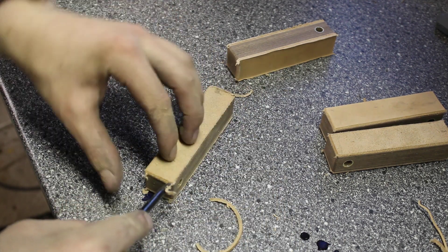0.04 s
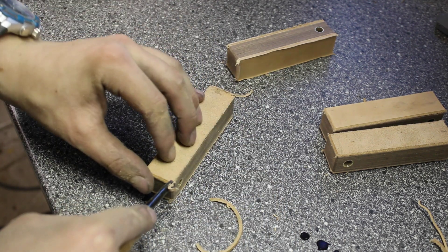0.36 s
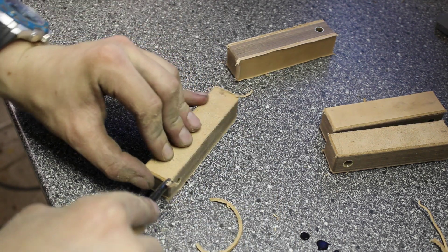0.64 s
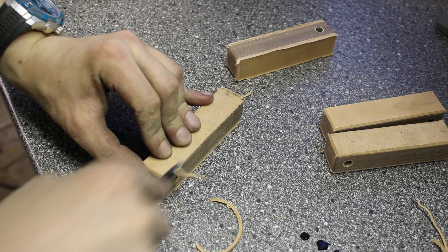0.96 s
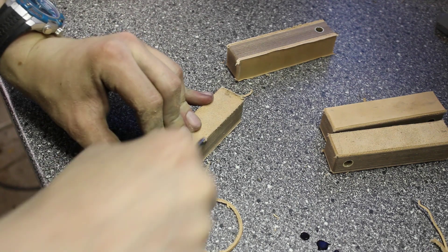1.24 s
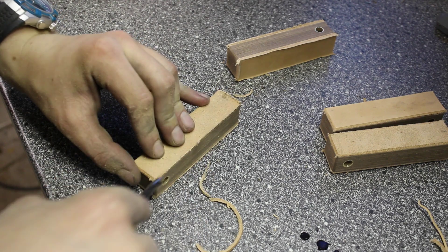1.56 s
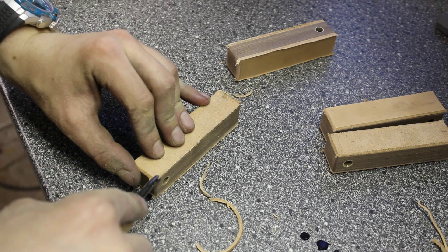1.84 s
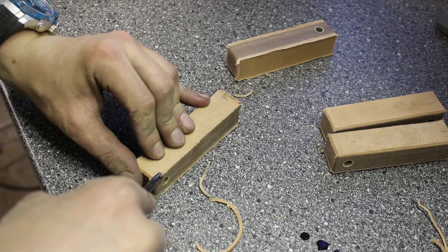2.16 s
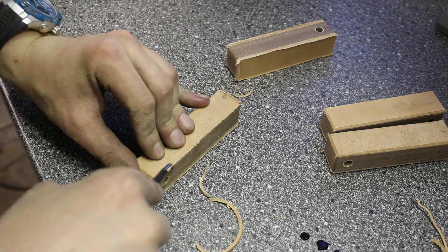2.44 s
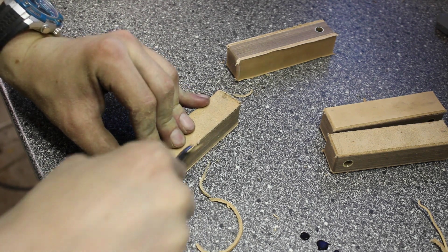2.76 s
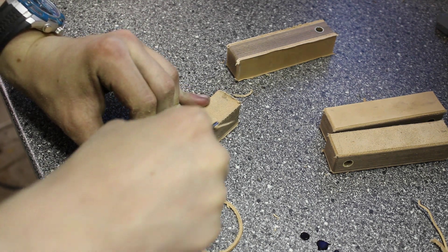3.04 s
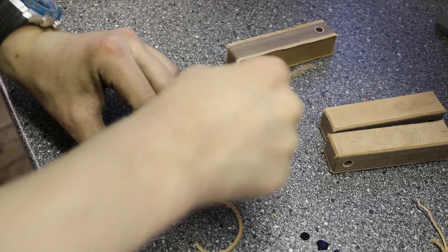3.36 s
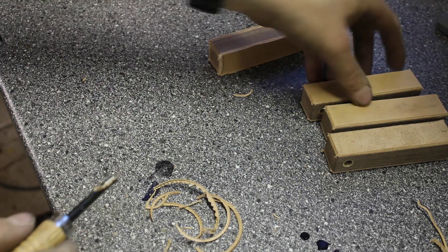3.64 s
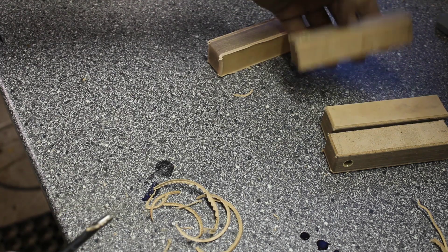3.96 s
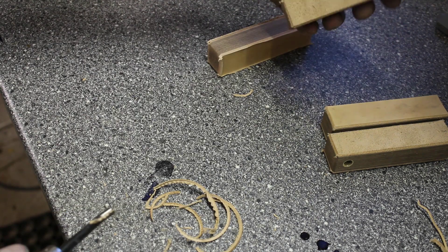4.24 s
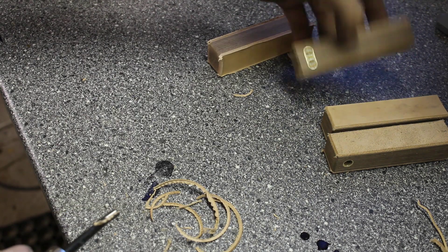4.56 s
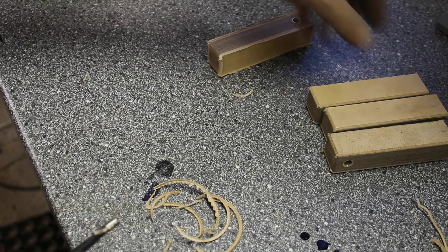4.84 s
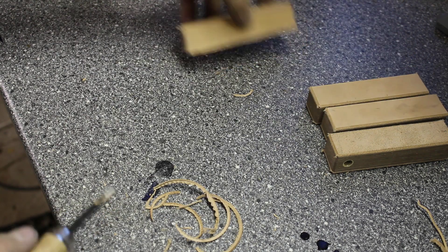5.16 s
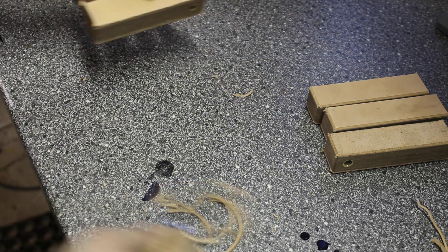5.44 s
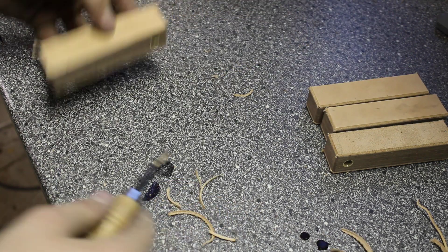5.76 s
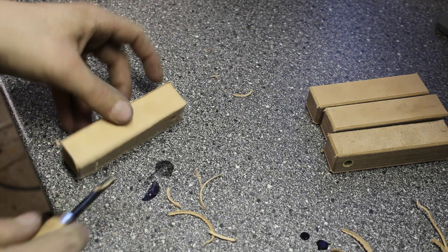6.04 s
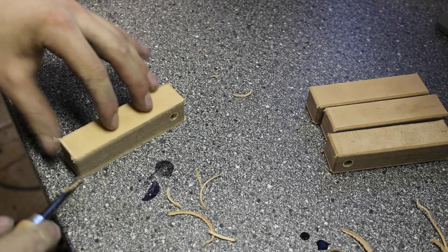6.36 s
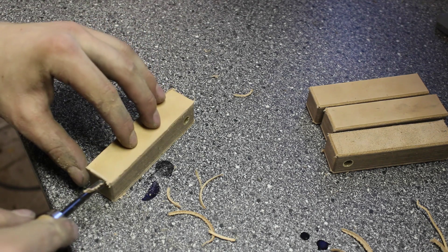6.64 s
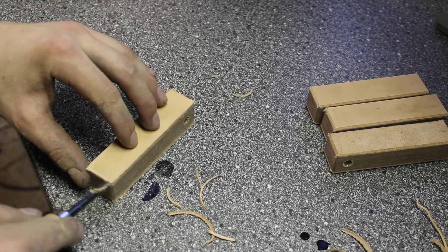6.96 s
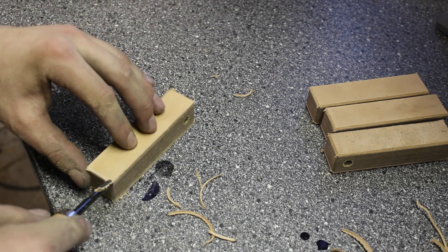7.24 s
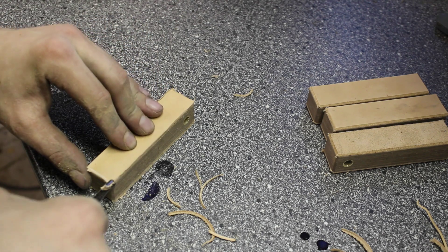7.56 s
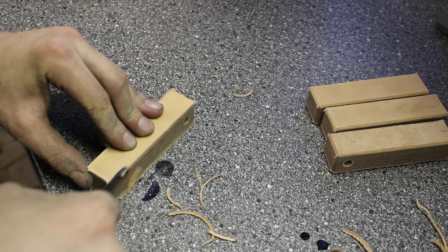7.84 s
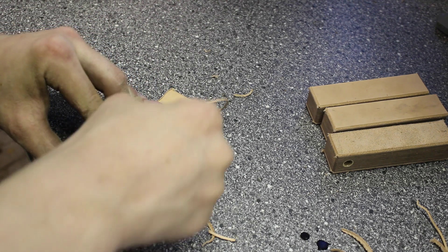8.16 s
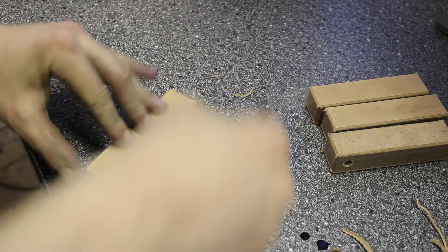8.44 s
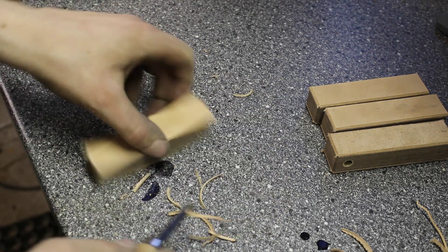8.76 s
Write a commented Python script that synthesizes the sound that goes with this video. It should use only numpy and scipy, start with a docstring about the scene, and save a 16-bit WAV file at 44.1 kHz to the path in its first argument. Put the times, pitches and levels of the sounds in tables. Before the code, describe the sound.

A steel hand tool rasps along leather-covered blocks in three strokes, with knocks and a sharp clack on a workbench in between.

```python
"""A steel edge tool shaves three strips off leather-covered blocks on a workbench, heard close and in mono.
The parting fibres form a dense train of random impulses that drives block, bench and blade into forced
vibration: a rasp. Between strokes, impacts excite free vibration as blocks are set down and the tool taps,
ticks and clacks, while friction of hands and leather gives swishes, hisses and brief squeaks.
The small, quiet workshop adds a short reverberation, a steady rush and a faint drone."""
import sys
import numpy as np
from scipy import signal
from scipy.fft import rfft, irfft
from scipy.io import wavfile

SR = 44100
rng = np.random.default_rng(int(sys.argv[2]) if len(sys.argv) > 2 else 0)


def to_wav(s):
    """Save 16-bit WAV."""
    ch = np.atleast_2d(s).T  # columns
    pcm = np.round(np.clip(ch, -1, 1) * 32767)  # PCM
    wavfile.write(sys.argv[1], SR, pcm.astype(np.int16))


N = 388521

# spectral envelopes (f/Hz, relative level/dB)
AIR_SPECTRUM = [(20, -14), (75, -1), (190, -2.5), (240, -2), (300, 3.5), (350, -1), (620, -4), (900, -12.5),
                (1700, -12.5), (4700, -18), (8500, -23.5), (11000, -32), (15500, -41)]   # rush of the room
SWISH_SPECTRUM = [(400, -43), (1500, -2), (3000, 3), (4300, 0.5), (6000, 4.5), (8000, 3.5), (9400, -4),
                  (10500, -11), (12500, -24), (15500, -36)]   # bright part of brushing
RUB_SPECTRUM = [(50, -46), (200, 4), (700, 2), (1300, 7), (2600, -3), (4000, -5.5), (7000, -14),
                (13000, -60)]   # dull part of friction
SLIDE_SPECTRUM = [(400, -51), (1500, -21), (3000, -3), (5000, 4), (8000, 7.5), (9400, -4.5), (10500, -5),
                  (13000, -25), (15500, -33)]   # hiss of slipping leather
TICK_SPECTRUM = [(400, -16), (1400, -10.5), (2200, -10), (3200, -16), (4800, -17), (6700, -10), (9000, -13),
                 (11000, -27), (15000, -33)]   # tiny hard contact
THUD_SPECTRUM = [(60, -46), (150, -1.5), (230, 8.5), (340, 2.5), (450, 2), (650, 1.5), (820, -4),
                 (1300, -20.5), (4000, -30)]   # padded impact
BOOM_SPECTRUM = [(30, -31), (60, -14), (85, -2), (135, -2), (175, -2), (400, -31), (1500, -76)]   # low push of an impact on the bench
EDGE_SPECTRUM = [(300, -15), (800, -10), (950, 2), (1200, -5), (1420, -2), (1650, -17.5), (1880, -13.5),
                 (2300, -19.5), (3000, -20), (4500, -29.5), (9000, -31.5), (14000, -69)]   # hard edge striking the bench
RASP_SPECTRUM = [(400, -34.5), (700, -15), (1000, -3.5), (1250, 0.5), (1600, -4), (1950, -5.5),
                 (2300, -5.5), (2600, -10.5), (3300, -15.5), (3900, -18.5), (6000, -15), (12000, -88.5)]   # cutting, through the block
THRUM_SPECTRUM = [(35, -51), (60, -13), (100, -3), (150, -1), (280, 0.5), (420, 4.5), (560, 4), (720, -0.5),
                  (1100, -23), (5000, -67)]   # cutting, through the bench
BLADE_SPECTRUM = [(2400, -37), (3200, -28.5), (4200, -10), (4800, 2), (5600, 4.5), (6800, 0), (7400, -19),
                  (9000, -26), (13000, -58.5)]   # cutting, through the blade
FIZZ_SPECTRUM = [(4000, -61), (6500, -12.5), (7400, -4.5), (8600, 0), (9400, -5), (10100, -17),
                 (12000, -44), (15000, -46)]   # finest fibres
CRISP_SPECTRUM = [(7000, -45), (9500, 4), (11000, 7), (12500, 0), (14000, -10), (15500, -23)]   # dry fibres

# normal modes (f/Hz, bandwidth/Hz, gain/dB)
BENCH_MODES = [(64.3, 4.8, 17), (80, 4.9, 17.5), (138.4, 10.5, 16), (182, 14, -12), (230, 42, 1.5),
               (302, 20, -5), (341, 22, -2.5), (422, 21, -6.5), (532, 30, 7.5), (563, 55, 4.5),
               (626, 260, -16.5), (790, 6.4, 0.5), (908, 23, 6), (1146, 29, 2), (1227, 9.3, 5),
               (1288, 11, 3.5), (1309, 26, -1.5), (1573, 44, 0), (1650, 33, 5.5), (1840, 44, 6.5),
               (1920, 6.8, -33)]   # bench top carrying a block
TOOL_MODES = [(136, 12, 5.5), (284, 240, 0.5), (560, 170, 1), (1040, 170, 4), (1350, 200, -1),
              (1720, 300, -1), (2130, 53, 4), (3220, 600, -0.5), (4020, 180, -22), (4860, 470, 3),
              (5080, 276, 11), (5470, 290, 2), (6100, 480, -3.5), (7540, 450, -22), (9440, 820, -11)]   # steel tool and handle
SHANK_MODES = [(3270, 150, 18), (5280, 300, -4), (5730, 90, 1), (6000, 90, 1), (6950, 110, 3)]   # shank of the blade

# envelope of the background drone (t/s, level/dB)
DRONE_ENVELOPE = [(0, -48.5), (0.8, -58), (1.5, -55), (2.0, -80), (3.5, -62), (4.1, -52), (4.65, -51),
                  (5.1, -64), (6.2, -71), (6.7, -54.5), (8.6, -61)]
# arm and hand crossing the bench (t/s, duration/s, swish level/dB, relative rub level/dB)
HAND_SWEEPS = [(3.779, 0.24, -50.5, -70), (5.18, 0.25, -45, -52.5), (5.318, 0.16, -55, -46),
               (5.464, 0.11, -46, -41.5), (5.663, 0.6, -53, -51.5), (5.826, 0.22, -42, -43),
               (8.252, 0.13, -41, -39.5), (8.425, 0.077, -45, -42), (8.482, 0.12, -56, -47.5)]
# block and fingertips sliding into place
# (t/s, duration/s, relative hiss level/dB, relative hum level/dB, crackle level/dB)
BLOCK_SLIDES = [(0.579, 0.025, -52, -63, -72), (0.618, 0.24, -52.5, -42.5, -74),
                (1.39, 0.12, -48, -49.5, -58), (3.922, 0.06, -55, -44.5, -72), (4.707, 0.14, -52, -58, -68),
                (4.861, 0.3, -61.5, -55.5, -85), (5.081, 0.12, -51.5, -63, -60),
                (6.074, 0.075, -45.5, -58, -53), (6.101, 0.35, -57.5, -57, -85),
                (6.408, 0.38, -47.5, -51.5, -55.5), (6.702, 0.3, -65, -72, -85),
                (7.07, 0.18, -57.5, -62, -80), (8.74, 0.15, -48.5, -46.5, -59)]
# leather squeaking on leather (t/s, duration/s, rms level/dB, f/Hz, bandwidth/Hz)
LEATHER_SQUEAKS = [(3.7, 0.029, -46, 4820, 220), (4.703, 0.058, -53, 4830, 120),
                   (5.376, 0.14, -50.5, 2440, 450)]
# contacts of blade and fingernails (t/s, peak level/dB, f/Hz)
SHARP_TICKS = [(0.3385, -42.5, 4750), (0.613, -32, 5100), (0.6345, -27.5, 6640), (0.9175, -32, 6730),
               (1.3916, -31.5, 6500), (1.406, -22.5, 4660), (3.256, -21, 5100), (3.7274, -33, 6500),
               (3.7988, -37.5, 6450), (3.9468, -32.5, 6360), (4.7732, -26.5, 6660)]
# light taps of the tool on a block (t/s, peak level/dB, f/Hz)
TOOL_TAPS = [(0.616, -31, 1450), (2.128, -37.5, 1150), (5.083, -31.5, 1300), (5.373, -31.5, 780),
             (7.562, -30, 1180), (8.618, -26, 1020)]
# the tool striking the bench (t/s, peak level/dB)
TOOL_CLACKS = [(5.477, -4.5)]
# blocks and hands landing on the bench (t/s, thud peak level/dB, thud f/Hz, boom f/Hz)
LANDINGS = [(0.075, -29.5, 170, 142), (1.86, -33, 225, 140), (3.444, -27, 231, 147),
            (3.682, -35.5, 260, 170), (3.729, -33, 335, 99), (3.824, -17, 297, 150),
            (3.934, -26.5, 290, 122), (4.701, -19.5, 248, 152), (4.725, -13.5, 248, 170),
            (4.748, -21, 238, 105), (4.792, -24, 207, 78), (5.111, -31, 240, 157), (5.285, -35.5, 380, 170),
            (5.785, -35.5, 420, 121), (6.064, -9, 388, 135), (6.08, -11, 301, 141), (6.127, -8, 342, 163),
            (6.48, -36, 294, 127), (8.755, -36, 304, 73)]
# one envelope for each stroke of the blade (t/s, rasp level/dB, treble level/dB)
STROKE_ENVELOPES = [
    [(2.12, -61, -57), (2.132, -57, -51), (2.144, -50, -58), (2.154, -45, -40.5), (2.178, -39, -49),
     (2.216, -53, -74), (2.24, -62, -67)],
    [(0.9, -68, -73), (0.916, -40, -52), (0.966, -27.5, -30.5), (1.056, -29.5, -32), (1.068, -35, -43),
     (1.092, -28.5, -30.5), (1.144, -26, -37.5), (1.178, -46, -65), (1.19, -38, -56)],
    [(2.25, -46.5, -57), (2.282, -30, -37), (2.378, -34, -39.5), (2.412, -39, -49), (2.478, -33.5, -36),
     (2.522, -29.5, -33), (2.68, -30.5, -32), (2.728, -34, -38), (2.755, -35, -52)],
    [(2.755, -39, -47), (2.787, -32, -33.5), (2.869, -24.5, -31.5), (2.959, -32.5, -41), (3.039, -32, -40),
     (3.203, -24, -25), (3.255, -22.5, -26), (3.267, -31.5, -55), (3.29, -30, -42)],
    [(7.6, -50, -64), (7.644, -42.5, -51), (7.666, -44, -57), (7.732, -32, -36), (7.852, -38, -47),
     (7.872, -34, -40), (7.946, -27, -29), (8.03, -25, -29), (8.07, -22.5, -31)],
    [(8.07, -19, -32), (8.074, -20, -32.5), (8.124, -23, -25.5), (8.162, -22.5, -24.5), (8.166, -20, -24),
     (8.188, -22, -30.5), (8.222, -25.5, -28.5), (8.254, -38.5, -55), (8.27, -40, -48)],
]
# how block and tool are held in each stroke (block f/Hz, block gain/dB, tip f/Hz, tip gain/dB,
# shank gain/dB, thrum gain/dB, fizz gain/dB, fizz growth over the stroke/dB, crackle gain/dB)
STROKE_GRIPS = [(1080, 3, 7100, 22, -12, 0, -7.5, 0, -25), (1100, -2.5, 6700, 7.5, -5, 1, -6.5, 3, -19),
                (1120, -2, 6550, 11, -2, -0.5, -11, -0.5, -25.5),
                (1100, -3, 6560, 8, 4.5, 2, -8, -3.5, -21),
                (1280, -27, 6900, 11, 7, -2.5, -9.5, 16.5, -17.5),
                (1300, -13, 5950, 13, 7, -4.5, -1.5, 2, -23)]

HIT_SAMPLES = SR // 2


def from_db(db):
    """Amplitude ratio of a level in decibels."""
    return 10 ** (np.asarray(db) / 20)


def unit_rms(x):
    """Normalisation to an rms of 1."""
    return x / np.sqrt(np.mean(x ** 2) + 1e-20)


def at_peak(x, peak_db):
    """Normalisation to a peak level."""
    return from_db(peak_db) * x / np.abs(x).max()


def in_time(rows, t):
    """Linear interpolation of each column of an envelope at the times t."""
    times, *columns = np.transpose(rows)
    return [np.interp(t, times, column) for column in columns]


def add(out, start, sound):
    """Superposition of a sound that begins at start, in seconds."""
    at = int(np.clip(start * SR, 0, N - 1))
    out[at:at + len(sound)] += sound[:N - at]


def colour(x, spectrum, size=4096):
    """Minimum-phase filtering: folding the cepstrum gives a causal response with this spectrum."""
    hz, db = np.transpose(spectrum)
    grid = np.maximum(np.fft.rfftfreq(size, 1 / SR), 1)
    gain = from_db(np.interp(np.log(grid), np.log(hz), db))
    cepstrum = irfft(np.log(gain))
    cepstrum[1:size // 2] *= 2
    cepstrum[size // 2 + 1:] = 0
    response = irfft(np.exp(rfft(cepstrum)))
    return signal.fftconvolve(x, response)[:len(x)]


def resonance(hz, width_hz):
    """Filter coefficients of a damped oscillator with unit gain at resonance."""
    r = np.exp(-np.pi * width_hz / SR)
    return (1 - r * r) / 2 * np.array([1, 0, -1]), [1, -2 * r * np.cos(2 * np.pi * hz / SR), r * r]


def ring(x, hz, width_hz):
    """Forced response of one damped oscillator."""
    return signal.lfilter(*resonance(hz, width_hz), x + 1e-18)


def gliding_ring(x, hz, width_hz, size=128):
    """Forced response of an oscillator whose natural frequency varies."""
    out, state = np.zeros(len(x)), np.zeros(2)
    for i in range(0, len(x), size):
        out[i:i + size], state = signal.lfilter(*resonance(hz[i], width_hz), x[i:i + size], zi=state)
    return out


def low_pass(x, hz, order=2):
    """Attenuation above a cutoff frequency."""
    return signal.sosfilt(signal.butter(order, min(hz, SR / 2 - 1000), fs=SR, output="sos"), x)


def scatter(t60, level_db):
    """Scattering: a unit impulse, then exponentially decaying reflections of the given total level."""
    t = np.arange(HIT_SAMPLES) / SR
    spray = rng.standard_normal(HIT_SAMPLES) * from_db(-np.minimum(60 * t / t60, 200))
    response = from_db(level_db) * spray / np.linalg.norm(spray)
    response[0] = 1
    return response


def snaps(t, per_s, spread_db):
    """Shot noise: fibres let go at random moments, most faintly and a few strongly."""
    sizes = from_db(spread_db * np.minimum(rng.exponential(1, len(t)), 4))
    signs = rng.choice([-1, 1], len(t))
    return sizes * signs * (rng.random(len(t)) < per_s / SR)


def waver(t, per_s):
    """Random modulation with a spread near 1."""
    knots = rng.standard_normal(len(t))
    return np.interp((t - t[0]) * per_s, np.arange(len(t)), knots)


def bench(force):
    """Modal superposition: the bench top radiates a force broadly and rings on at its modes."""
    return force + sum(from_db(db) * ring(force, hz, width) for hz, width, db in BENCH_MODES)


def background(air_db=-50.5, drone_hz=660, drone_width_hz=460, whine_hz=1930, whine_db=-15.5):
    """Filtered noise: a steady broadband rush, with a hollow drone and thin whine that swell and fade."""
    level, = in_time(DRONE_ENVELOPE, np.arange(N) / SR)
    rush, hollow, thin = rng.standard_normal((3, N))
    air = from_db(air_db) * unit_rms(colour(rush, AIR_SPECTRUM))
    drone = unit_rms(ring(ring(hollow, drone_hz, drone_width_hz), drone_hz, drone_width_hz))
    whine = from_db(whine_db) * unit_rms(ring(thin, whine_hz, width_hz=22))
    return air + from_db(level) * (drone + whine)


def workshop(direct):
    """Reverberation: a short diffuse tail, a little duller than the direct sound."""
    tail = scatter(t60=0.41, level_db=-7.0)
    tail[0] = 0
    return direct + signal.fftconvolve(direct, low_pass(tail, hz=3600, order=1))[:N]


def brushing(rub_gain_db=-3.5, speed_exponent=0.63):
    """Friction noise of arm and hand on the bench: its amplitude follows a power of their speed."""
    out = np.zeros(N)
    for start, length, swish_db, rub_db in HAND_SWEEPS:
        t = np.arange(int(length * SR)) / SR
        speed = np.sin(np.pi * t / length)
        swish = unit_rms(colour(snaps(t, per_s=25000, spread_db=4.0), SWISH_SPECTRUM))
        rub = unit_rms(colour(snaps(t, per_s=14000, spread_db=0.0), RUB_SPECTRUM))
        friction = from_db(swish_db) * swish + from_db(rub_db + rub_gain_db) * rub
        add(out, start, speed ** speed_exponent * friction)
    return out


def sliding(hiss_gain_db=1.0, hum_gain_db=-5.5, block_hz=1480, rise_share=0.13, fall_share=0.56):
    """Sliding friction: leather hisses in proportion to its speed and drives a faint hum in the block."""
    out = np.zeros(N)
    for start, length, hiss_db, hum_db, crackle_db in BLOCK_SLIDES:
        t = np.arange(int(length * SR)) / SR
        speed = np.clip(np.minimum(t / rise_share, (length - t) / fall_share) / length, 0, 1)
        force = snaps(t, per_s=16000, spread_db=3.5)
        hiss = from_db(hiss_db + hiss_gain_db) * unit_rms(colour(force, SLIDE_SPECTRUM))
        block = ring(colour(force, RUB_SPECTRUM), block_hz, width_hz=1400)
        hum = from_db(hum_db + hum_gain_db) * unit_rms(block)
        crackle = from_db(crackle_db) * unit_rms(colour(force, CRISP_SPECTRUM))
        add(out, start, speed * (hiss + hum + crackle))
    return out


def squeaks():
    """Stick-slip friction: a short run of slips, leather on leather, excites one narrow resonance."""
    out = np.zeros(N)
    for start, length, level_db, hz, width in LEATHER_SQUEAKS:
        t = np.arange(int(length * SR)) / SR
        slips = ring(snaps(t, per_s=2400, spread_db=3.5), hz, width)
        add(out, start, from_db(level_db) * unit_rms(slips * signal.windows.tukey(len(t), .5)))
    return out


def ticks(ring_db=12.0):
    """Impulse excitation: a tiny hard contact gives a broadband crunch and one bright resonance."""
    out = np.zeros(N)
    for start, peak_db, hz in SHARP_TICKS:
        crunch = colour(scatter(t60=0.053, level_db=20.0), TICK_SPECTRUM)
        tick = crunch + from_db(ring_db) * ring(crunch, hz, width_hz=340)
        add(out, start, at_peak(tick, peak_db))
    return out


def taps():
    """Damped resonance: the tool touches the leather with a short, hollow tap."""
    out = np.zeros(N)
    for start, peak_db, hz in TOOL_TAPS:
        hollow = ring(scatter(t60=0.039, level_db=10.0), hz, width_hz=350)
        add(out, start, at_peak(low_pass(hollow, hz=3620), peak_db))
    return out


def clacks(steel_hz=5170, steel_db=-15.0, rap_db=-15.5):
    """Free vibration: the tool raps the bench and its modes ring; a lightly damped steel tone lingers."""
    out = np.zeros(N)
    for start, peak_db in TOOL_CLACKS:
        force = low_pass(scatter(t60=0.035, level_db=0.0), hz=10100, order=4)
        modes = sum((-1) ** k * from_db(db) * ring(force, hz, width)
                    for k, (hz, width, db) in enumerate(TOOL_MODES))
        steel = from_db(steel_db) * ring(force, steel_hz, width_hz=16)
        rap = colour(scatter(t60=0.053, level_db=10.0), EDGE_SPECTRUM)
        add(out, start, at_peak(modes + steel, peak_db) + at_peak(rap, peak_db + rap_db))
    return out


def knocks(padded_hz=243, firm_db=-13, bounce_db=-3.0, bounce_t60=0.089, sag=0.23, sag_s=.015):
    """Cushioned impact of a block: a harder landing thuds higher, booms less and clacks more."""
    out, t = np.zeros(N), np.arange(HIT_SAMPLES) / SR
    for start, thud_db, thud_hz, boom_hz in LANDINGS:
        hardness = np.log2(thud_hz / padded_hz)   # octaves above a flat landing on the leather
        impact = low_pass(colour(scatter(t60=0.11, level_db=3.0), THUD_SPECTRUM), 2.43 * thud_hz)
        # the block bounces on its leather, falling in pitch as the squeezed pad relaxes
        bounce_hz = thud_hz * (1 + sag * np.exp(-t / sag_s))
        bounce = np.sin(2 * np.pi * np.cumsum(bounce_hz) / SR) * from_db(-60 * t / bounce_t60)
        thud = at_peak(bench(impact), 0) + from_db(bounce_db) * bounce
        add(out, start, at_peak(thud, thud_db))
        # the place of the blow decides which low bench mode booms
        push = ring(colour(scatter(t60=0.2, level_db=-5.5), BOOM_SPECTRUM), boom_hz, width_hz=65)
        boom_db = thud_db - 9.0 - 10.5 * hardness
        add(out, start, at_peak(bench(push), boom_db))
        # a hard edge clacks; a gentle landing stays on the padding and clacks less
        edge = colour(scatter(t60=0.052, level_db=21.0), EDGE_SPECTRUM)
        clack_db = thud_db - 18.0 + 21 * hardness + 0.44 * (thud_db - firm_db)
        add(out, start, at_peak(bench(edge), clack_db))
    return out


def cutting(firm_rasp_db=-28, firm_treble_db=-41, tip_sag_hz=200, tip_waver_hz=90, waver_db=3.5):
    """Forced vibration: one stream of parting fibres drives the block, the bench and the blade."""
    out = np.zeros(N)
    for stroke, grip in zip(STROKE_ENVELOPES, STROKE_GRIPS):
        block_hz, block_db, tip_hz, tip_db, shank_db, thrum_db, fizz_db, growth_db, crackle_db = grip
        t = np.arange(int(stroke[0][0] * SR), int(stroke[-1][0] * SR)) / SR
        gate = np.clip(np.minimum(t - t[0], t[-1] - t) / 0.0048, 0, 1)
        rasp_db, treble_db = in_time(stroke, t)
        along = np.linspace(-.5, .5, len(t))
        # in a harder push the thrum grows less than the rasp; the finest fibres keep up with the treble
        low_db = firm_rasp_db - 4.5 + 0.71 * (rasp_db - firm_rasp_db)
        fine_db = firm_treble_db + 0.99 * (treble_db - firm_treble_db)
        # the blade catches and frees itself in the uneven hide
        catch = from_db(1.06 * waver(t, per_s=90))
        force = snaps(t, per_s=4200, spread_db=2.5) * catch
        block = colour(force, RASP_SPECTRUM)
        block_gain = from_db(block_db + waver_db * waver(t, per_s=30))
        block = block + block_gain * ring(block, block_hz, width_hz=170)
        rasp = from_db(rasp_db) * unit_rms(bench(block))
        thrum = from_db(low_db + thrum_db) * unit_rms(bench(colour(force, THRUM_SPECTRUM)))
        # the tip's resonance sinks along the stroke; the shank's modes stay put, each excited unevenly
        steel = colour(force, BLADE_SPECTRUM)
        tip_gain = from_db(tip_db + waver_db * waver(t, per_s=31))
        glide_hz = tip_hz - tip_sag_hz * along + tip_waver_hz * waver(t, per_s=60)
        tip = tip_gain * gliding_ring(steel, glide_hz, width_hz=170)
        shank = sum(from_db(db + shank_db + waver_db * waver(t, per_s=33.8)) * ring(steel, hz, width)
                    for hz, width, db in SHANK_MODES)
        blade = from_db(treble_db) * unit_rms(steel + tip + shank)
        # the finest fibres fizz, and dry ones crackle on top
        fizz_gain = from_db(fine_db + fizz_db + growth_db * along + 1.5 * waver(t, per_s=38.4))
        fizz = fizz_gain * unit_rms(colour(force, FIZZ_SPECTRUM))
        dry_snaps = catch * snaps(t, per_s=5000, spread_db=3.0)
        crackle = from_db(fine_db + crackle_db) * unit_rms(colour(dry_snaps, CRISP_SPECTRUM))
        add(out, t[0], gate * (rasp + thrum + blade + fizz + crackle))
    return out


def scene():
    """Superposition of the handwork, its reverberation and the background, alike in both channels."""
    rubbed = cutting() + brushing() + sliding() + squeaks()
    struck = knocks() + taps() + ticks() + clacks()
    mono = workshop(rubbed + struck) + background()
    return np.stack([mono, mono])


def record(dry):
    """Band limiting: a steep elliptic low-pass removes the highest treble."""
    cutoff_hz = 15300
    return signal.sosfilt(signal.ellip(10, .1, 80, cutoff_hz, fs=SR, output="sos"), dry)


dry = scene()
out = record(dry)
to_wav(out)
```